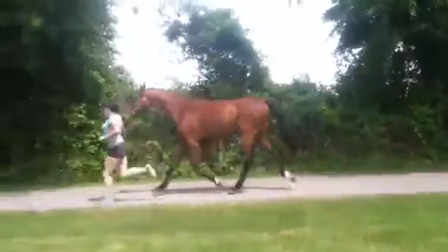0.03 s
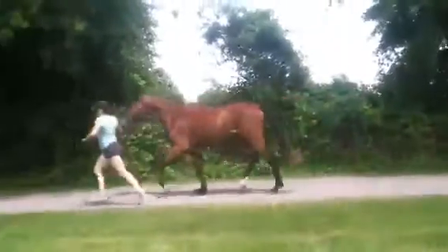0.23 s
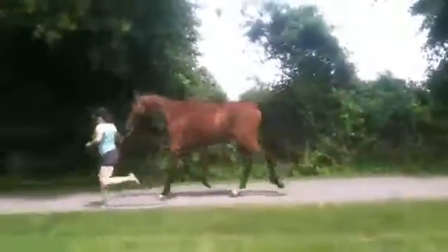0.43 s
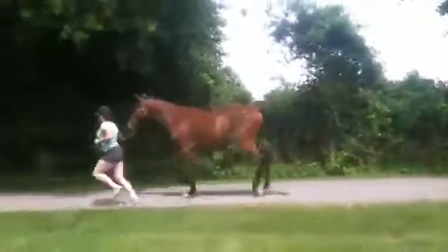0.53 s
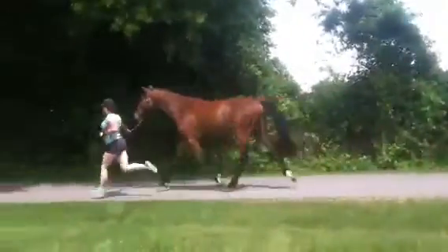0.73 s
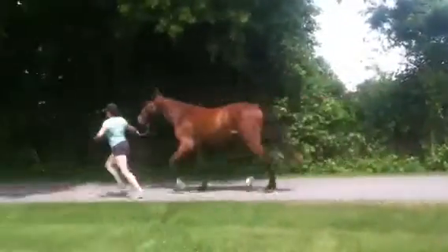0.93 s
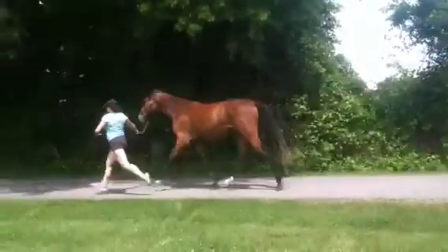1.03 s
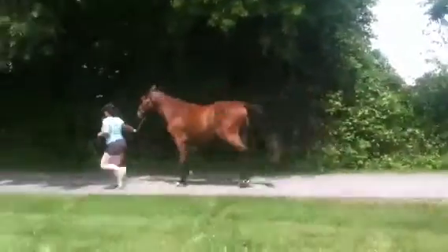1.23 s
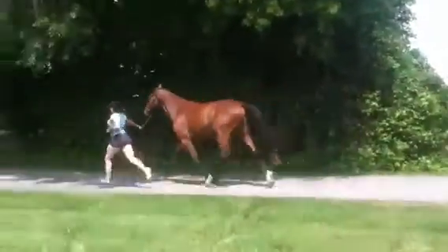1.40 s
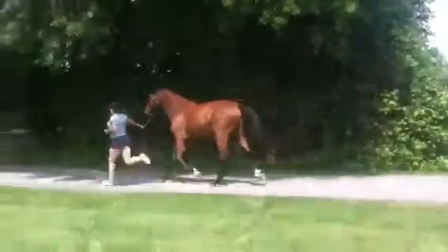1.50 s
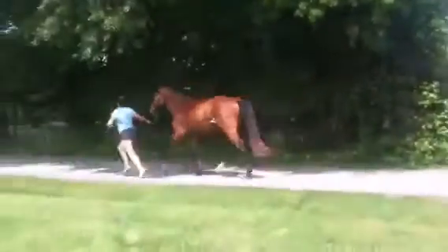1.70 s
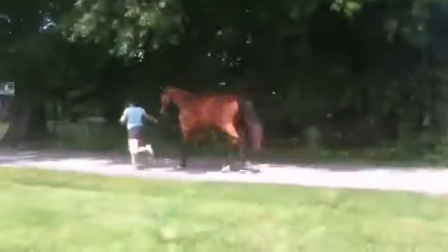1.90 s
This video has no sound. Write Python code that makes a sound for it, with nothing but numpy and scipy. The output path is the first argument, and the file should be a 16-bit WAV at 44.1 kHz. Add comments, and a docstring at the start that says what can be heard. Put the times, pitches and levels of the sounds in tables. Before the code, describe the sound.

A horse trots on a paved path, with light running footsteps alongside.

```python
"""A horse trots along a paved path, some metres from a small microphone, led by a runner.
The two hooves of each diagonal pair land a moment apart: the wall clicks, the cupped sole rings hollow,
the weight thuds, and grit scrapes. Shoes scuff lightly between the beats. The steps reach the microphone
across grass, and a line of trees echoes them. Behind are a faint breeze, a far-off hum and one bird note."""
import sys
import numpy as np
from scipy import signal
from scipy.fft import rfft, irfft
from scipy.io import wavfile
from scipy.ndimage import uniform_filter1d

SR = 44100
rng = np.random.default_rng(int(sys.argv[2]) if len(sys.argv) > 2 else 0)


def pcm_store(signal):
    """Save signal as 16-bit PCM."""
    levels = np.round(np.clip(np.atleast_2d(signal), -1, 1) * 32767)
    wavfile.write(sys.argv[1], SR, levels.astype(np.int16).T)


N = 85995

# colours of the breeze and of its high rustle (frequency [Hz], gain [dB])
BREEZE_COLOUR = [(25, -54), (70, 14), (95, -1), (122, 13), (170, 0), (260, 1), (370, 2), (560, -2.5),
                 (1000, 0), (1500, -3.5), (2400, -4.5), (4700, -16), (7700, -29.5), (11000, -27.5),
                 (16000, -32)]
RUSTLE_COLOUR = [(500, -32), (2500, -2.5), (3700, -1), (5000, -3.5), (6300, -2), (7700, -4), (9500, -9),
                 (11500, -21.5), (16000, -32)]
# rise and fall of the breeze, the rustle and the far-off hum (time [s], level [dB])
BREEZE_LEVELS = [(0, -64.5), (.19, -63), (.5, -59.5), (.9, -62), (1.1, -62.5), (1.27, -63), (1.55, -59),
                 (1.95, -59)]
RUSTLE_LEVELS = [(0, -68.5), (.2, -72), (.45, -69.5), (.55, -64.5), (.72, -69.5), (.88, -67), (.97, -53),
                 (1.01, -52.5), (1.06, -70), (1.15, -69), (1.7, -72.5), (1.83, -63), (1.95, -67)]
HUM_LEVELS = [(0, -84), (.35, -79), (.5, -64), (.75, -72), (1.2, -79), (1.45, -67.5), (1.65, -62.5),
              (1.95, -72.5)]
# taps of the runner's shoes (time [s], level [dB], pitch [Hz])
SHOE_TAPS = [(0.0324, -59, 2240), (0.0458, -42, 1780), (0.409, -40, 1900), (.758, -35.5, 2800),
             (0.77, -50, 2450), (1.159, -41.5, 2420), (1.544, -33, 2320)]
# shoes and hooves sliding on grit
# (peak time [s], rise [s], fall [s], rasp pitch [Hz], rasp [dB], hiss [dB], rumble [dB])
SHOE_SCUFFS = [(.046, 0.023, 0.015, 1950, -49, -56, -72), (.415, .03, 0.02, 2400, -57, -67, -79),
               (.782, 0.021, 0.017, 2390, -50.5, -60, -72.5), (1.166, .01, 0.011, 2330, -55, -72, -83),
               (1.546, 0.01, 0.0092, 2330, -47.5, -52.5, -72), (1.92, 0.021, 0.025, 2170, -57, -58, -100)]
HOOF_SCRAPES = [(.223, 0.002, 0.0025, 1840, -39, -72, -38.5), (.272, 0.012, 0.0057, 1640, -49, -50, -43),
                (.585, 0.00072, 0.0072, 2180, -51, -43.5, -51),
                (.597, 0.003, 0.0046, 1800, -29.5, -34, -48), (.624, 0.0048, 0.01, 2100, -79, -55.5, -79),
                (.925, 0.054, 0.058, 1380, -56, -61, -77), (.968, 0.0031, 0.0028, 1820, -38, -42, -37),
                (.993, 0.027, 0.035, 1750, -51, -56.5, -56.5), (1.311, 0.0037, 0.0078, 1950, -40, -37, -58),
                (1.324, 0.0057, 0.0033, 2100, -50, -56, -57), (1.724, 0.01, .016, 2050, -48, -52, -48)]
# colour of rasping grit (frequency [ratio to rasp pitch], gain [dB])
RASP_COLOUR = [(.06, -45), (.27, -31.5), (.45, -10), (.75, 0.5), (1.25, 0), (1.6, -6), (1.95, -15),
               (2.4, -34), (4.5, -24), (8, -32.5)]
# colours of a sliding foot's hiss and rumble, and of cracking stone (frequency [Hz], gain [dB])
HISS_COLOUR = [(500, -6), (2500, 3.5), (3700, -3), (4700, -6), (6300, -1), (8000, 0), (9500, -7.5),
               (11500, -25.5), (16000, -51)]
RUMBLE_COLOUR = [(30, -26), (90, -26), (150, 11), (250, -0.5), (370, -11.5), (500, -16.5), (780, 2),
                 (1300, -25.5), (4000, -76), (16000, -73)]
CRACK_COLOUR = [(500, -38), (2500, -0.5), (3700, 1), (4700, -3.5), (6300, -3), (8300, 2.5), (9800, -9),
                (11500, -15.5), (16000, -18)]
# way to the microphone: the bounce off the grass cuts two dips (frequency [Hz], gain [dB])
PATH_TO_MIC = [(150, -1), (270, 2.5), (400, -1), (500, -4.5), (590, -3), (680, 2), (1000, -1), (2300, 0.5),
               (3800, -1), (4900, -3.5), (6500, -1), (16000, -2.5)]
# colours of the echoes from foliage and trunks (frequency [Hz], gain [dB])
FOLIAGE_COLOUR = [(60, -6), (150, -5), (320, -4.5), (550, -0.5), (800, -6.5), (1100, 1.5), (1500, -10),
                  (2500, -3.5), (5000, 4), (16000, -21)]
TRUNK_COLOUR = [(200, -25), (550, -14), (800, -2), (1000, 4.5), (1200, 6), (1450, -28), (2400, -8),
                (6000, -43)]
# clops thrown back by the trunks (time [s], level [dB], swell [s])
TRUNK_RETURNS = [(.118, -54.5, 0.0021), (0.307, -48, 0.0038), (0.362, -51.5, 0.0031), (.463, -49, 0.0035),
                 (0.682, -48, 0.0068), (.697, -48, 0.0093), (0.874, -55.5, 0.0032), (1.105, -56, 0.0016),
                 (1.375, -48, 0.0047), (1.399, -45.5, 0.0068), (1.413, -51.5, .006), (1.591, -52, .003)]
# hooves meeting the paving (time [s], click [dB], click pitch [Hz], click top [Hz],
# crunch [dB re click], hollow [dB], hollow pitch [Hz], hollow swell [s], thud [dB], grit [dB])
HOOF_CONTACTS = [(0.2179, -23.5, 1710, 3550, -2, -40.5, 760, 0.0037, -45, -62),
                 (0.2276, -26, 2040, 3830, -1, -65, 830, .003, -76, -52),
                 (0.2361, -10.5, 1760, 2940, -4, -26.5, 758, 0.0049, -37, -42.5),
                 (0.2656, -18, 2000, 3970, -11, -36, 990, 0.0046, -51, -64),
                 (0.2695, -35, 1600, 3380, 4, -50, 786, 0.002, -49, -53.5),
                 (0.6382, -16.5, 2040, 4250, -5.5, -26, 1111, 0.004, -55, -41),
                 (0.6389, -25, 1980, 3830, 0, -32.5, 774, 0.0053, -52, -57),
                 (0.6456, -22.5, 1580, 4250, -16, -30, 1090, 0.0033, -42.5, -49),
                 (0.9741, -20.5, 1940, 3200, -21, -70, 770, .003, -47.5, -55),
                 (0.9964, -24, 1830, 3270, -10, -49.5, 800, 0.0076, -44.5, -55),
                 (1.0021, -19.5, 2010, 3300, -9, -65, 880, 0.0042, -41.5, -60),
                 (1.3524, -14.5, 1674, 4300, -1.5, -24, 797, 0.0028, -35.5, -43),
                 (1.6797, -13.5, 1720, 2750, 0, -26.5, 1079, 0.0037, -35, -47.5),
                 (1.6889, -45, 1230, 2670, -9, -29, 872, 0.003, -34.5, -63),
                 (1.7173, -26, 1270, 3500, -6, -44, 1124, 0.0029, -39, -60.5)]
# modes of the hoof wall, also used for shoe taps (frequency [ratio to pitch], level [dB], t60 [s])
WALL_MODES = [(.62, -38.5, 0.003), (.86, -10, 0.0043), (1.04, -8.5, 0.0032), (1.27, -11, 0.0028),
              (2.0, -18.5, 0.012)]
# modes of the hollow under the sole (frequency [ratio to pitch], level [dB])
SOLE_MODES = [(0.742, -15.5), (0.998, -2.5), (1.332, -8)]
# modes of the ground under the hoof (frequency [Hz], level [dB])
GROUND_MODES = [(170, -5.5), (265, -6), (380, -14.5)]
# loose grains of stone snapping (time [s], level [dB])
STONE_TICKS = [(0.4266, -47), (0.4975, -42), (0.797, -43.5), (.828, -43.5), (1.5915, -51), (1.6227, -46.5)]


def undb(db):
    """Decibels to gain."""
    return 10 ** (np.asarray(db) / 20)


def unit(x):
    """Scale to rms 1."""
    return x / np.sqrt(np.mean(x ** 2))


def since(start):
    """Seconds since a moment, negative before it."""
    return np.arange(N) / SR - start


def curve(points):
    """Straight lines through (time [s], level [dB]) points."""
    return np.interp(since(0), *np.array(points).T)


def fade(t, fall_s):
    """Sudden start, exponential fall."""
    return (t >= 0) * np.exp(-np.abs(t) / fall_s)


def hump(t, swell_s):
    """Smooth rise to 1 and a slower fall."""
    u = np.maximum(t, 0) / swell_s
    return (u * np.exp(1 - u)) ** 2


def add(out, start, sound):
    """Mix a short sound in at a moment."""
    first = int(start * SR)
    out[first:first + len(sound)] += sound[:N - first]


def colour(x, points):
    """Causal filter through (frequency [Hz], gain [dB]) points."""
    hz, db = np.array(points).T
    size = 2 * N
    bins_hz = np.maximum(np.arange(N + 1) * SR / size, 1)
    gain = undb(np.interp(np.log(bins_hz), np.log(hz), db))
    cepstrum = irfft(np.log(gain))
    cepstrum[1:N] *= 2  # fold to minimum phase
    cepstrum[N + 1:] = 0
    return irfft(rfft(x, size) * np.exp(rfft(cepstrum)))[:N]


def through(x, response):
    """Convolve and keep the length."""
    return signal.fftconvolve(x, response)[:N]


def walk(rate_hz):
    """Smooth random wander with rms 1."""
    width = max(int(SR / rate_hz), 1)
    return unit(uniform_filter1d(uniform_filter1d(rng.standard_normal(N), width), width))


def grains(size=N, spread_db=3.5):
    """Dense tiny clicks of very unequal size."""
    clicks = rng.standard_normal(size) * (rng.random(size) < .2)
    strength_db = spread_db * np.minimum(rng.exponential(size=size), 3.1)
    return unit(clicks * undb(strength_db))


def breeze(waver_db=0.83, flicker_db=1.8):
    """Soft outdoor air around the microphone, with a flickering high rustle."""
    air = unit(colour(rng.standard_normal(N), BREEZE_COLOUR))
    air *= undb(curve(BREEZE_LEVELS) + waver_db * walk(17))
    rustle = unit(colour(grains(), RUSTLE_COLOUR))
    rustle *= undb(curve(RUSTLE_LEVELS) + flicker_db * walk(55))
    return air + rustle


def hum(pitch_hz=365, waver_hz=44.66):
    """A faint, low tone wavers far off."""
    hz = pitch_hz + waver_hz * walk(68.5)
    return undb(curve(HUM_LEVELS)) * np.sin(2 * np.pi * np.cumsum(hz) / SR)


def scuffs(slides):
    """A foot slides on the path: grains rasp, hiss and shake the ground."""
    hiss = unit(colour(grains(), HISS_COLOUR))
    rumble = unit(colour(grains(), RUMBLE_COLOUR))
    out = np.zeros(N)
    for peak, rise, fall, hz, rasp_db, hiss_db, rumble_db in slides:
        t = since(peak)
        envelope = np.exp(-np.abs(t) / np.where(t < 0, rise, fall))
        rasp = unit(colour(grains(), [(ratio * hz, db) for ratio, db in RASP_COLOUR]))
        out += envelope * (undb(rasp_db) * rasp + undb(hiss_db) * hiss + undb(rumble_db) * rumble)
    return out


def knock(start, hz, top_hz, crunch_db, push_s=0.000081, crunch_s=0.0042):
    """A first touch and a crunch of small contacts ring short hard modes, dulled above top_hz."""
    age, lead, out = np.arange(SR // 20) / SR, 4 * push_s, np.zeros(N)
    push = np.exp(-((age - lead) / push_s) ** 2)
    crunch = grains(len(age)) * fade(age - lead, crunch_s)
    force = push / push.sum() + undb(crunch_db) * crunch / np.linalg.norm(crunch)
    ring = sum(undb(db) * np.sin(2 * np.pi * ratio * hz * age) * fade(age, t60 / np.log(1000))
               for ratio, db, t60 in WALL_MODES)
    ring = signal.sosfilt(signal.butter(4, top_hz, fs=SR, output="sos"), ring)
    add(out, start - lead, through(force, ring))
    return out


def runner():
    """Running shoes scuff and tap lightly beside the horse."""
    slides = scuffs(SHOE_SCUFFS)
    taps = sum(undb(db) * knock(start, hz, top_hz=3880, crunch_db=-14) for start, db, hz in SHOE_TAPS)
    return slides + taps


def scatter(t60_s):
    """Response of many small reflectors, with energy 1."""
    response = rng.standard_normal(N) * fade(since(0), t60_s / np.log(1000))
    return response / np.linalg.norm(response)


def trees(steps, delay_s=.014):
    """Foliage scatters the steps into a thin tail; brief swells of noise stand for the trunks' echoes."""
    t = since(0)
    near = undb(-14.5) * scatter(t60_s=0.18)
    far = undb(-16.5) * scatter(t60_s=0.78)
    tail = through(colour(steps, FOLIAGE_COLOUR), near + far)
    foliage = np.interp(t - delay_s, t, tail, left=0)
    returns = sum(undb(db) * hump(since(start), swell_s) for start, db, swell_s in TRUNK_RETURNS)
    return foliage + returns * unit(colour(rng.standard_normal(N), TRUNK_COLOUR))


def resonance(t, hz, swell_s, sag=0, sag_s=0.0016):
    """A mode swells and dies; it starts sharp by the fraction sag and sinks to its pitch."""
    cycles = hz * (t + sag * sag_s * (1 - np.exp(-t / sag_s)))
    return hump(t, swell_s) * np.sin(2 * np.pi * cycles)


def hooves(grit_rise_s=0.0012, grit_fall_s=0.0039):
    """Each contact rings the wall, the hollow under the sole and the ground, and crushes grit."""
    out, grit, age = np.zeros(N), np.zeros(N), since(0)[:SR // 20]
    thud = sum(undb(db) * resonance(age, hz, swell_s=0.0049) for hz, db in GROUND_MODES)
    crush = 2 * fade(age, grit_fall_s) * (1 - fade(age, grit_rise_s))  # peaks near 1
    for (start, click_db, click_hz, top_hz, crunch_db,
         hollow_db, hollow_hz, swell_s, thud_db, grit_db) in HOOF_CONTACTS:
        out += undb(click_db) * knock(start, click_hz, top_hz, crunch_db)
        hollow = sum(undb(db) * resonance(age, ratio * hollow_hz, swell_s, sag=0.46)
                     for ratio, db in SOLE_MODES)
        roughness = 1 + 0.14 * walk(1300)[:len(age)]
        add(out, start, undb(hollow_db) * hollow * roughness + undb(thud_db) * thud)
        add(grit, start, undb(grit_db) * crush)
    return out + grit * unit(colour(grains(), CRACK_COLOUR))


def stone_ticks(fall_s=0.00084):
    """Single bits of stone snap on the paving."""
    snaps = sum(undb(db) * fade(since(start), fall_s) for start, db in STONE_TICKS)
    return snaps * unit(colour(rng.standard_normal(N), CRACK_COLOUR))


def bird(peak_s=1.588, width_s=0.051, pitch_hz=6100, fall_hz_per_s=15000):
    """A distant bird gives one thin, wavering, falling note."""
    t = since(peak_s)
    hz = pitch_hz - fall_hz_per_s * t + 50 * walk(170)
    envelope = undb(-69) * np.exp(-(t / width_s) ** 2)
    return envelope * np.sin(2 * np.pi * np.cumsum(hz) / SR)


def scene():
    """Horse and runner some metres off across the grass, trees behind them, heard from one spot."""
    on_path = hooves() + scuffs(HOOF_SCRAPES) + runner() + stone_ticks()
    steps = colour(on_path, PATH_TO_MIC)
    return (steps + trees(steps) + breeze() + hum() + bird())[None]


def record(dry):
    """A small microphone lets little deep bass through and cuts the top."""
    bass_cut_hz, leak_db, top_hz = 151.5, -19.5, 15650
    low_cut = signal.butter(5, bass_cut_hz, "high", fs=SR, output="sos")
    high_cut = signal.ellip(10, .2, 70, top_hz, fs=SR, output="sos")
    thin = signal.sosfilt(low_cut, dry) + undb(leak_db) * dry
    return signal.sosfilt(high_cut, thin)


dry = scene()
out = record(dry)
pcm_store(out)
```